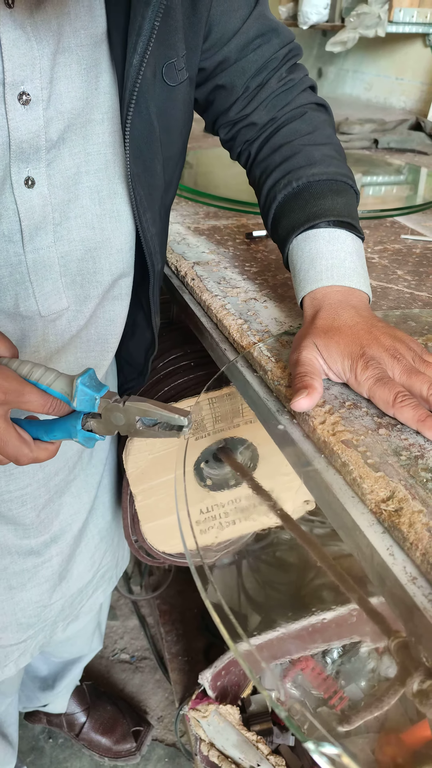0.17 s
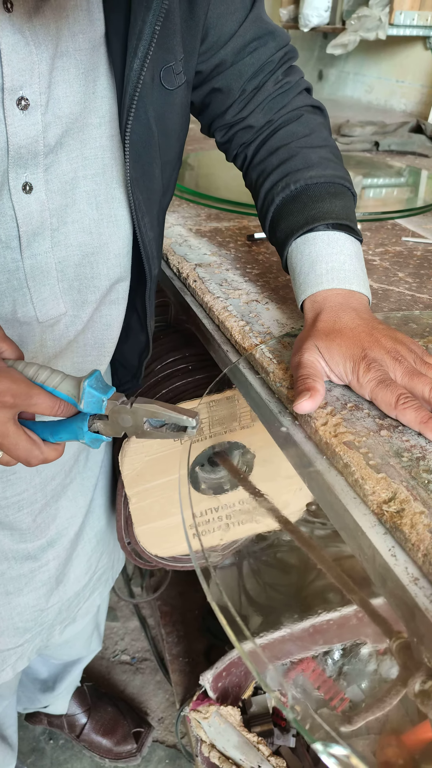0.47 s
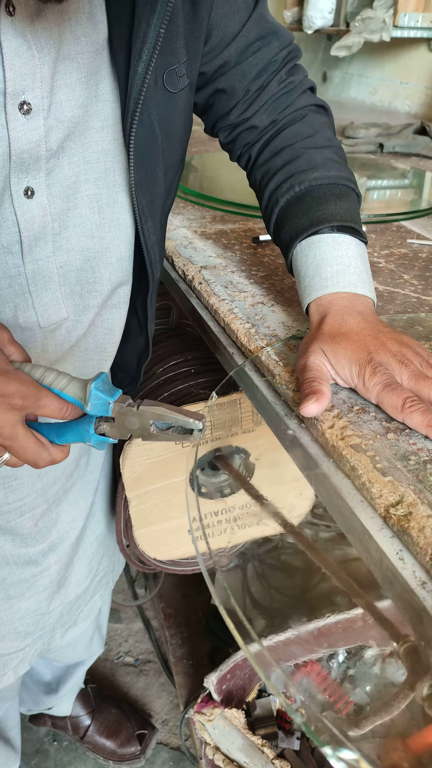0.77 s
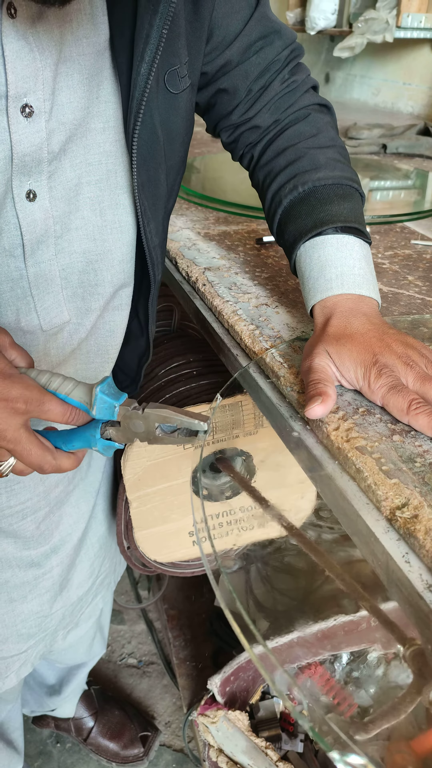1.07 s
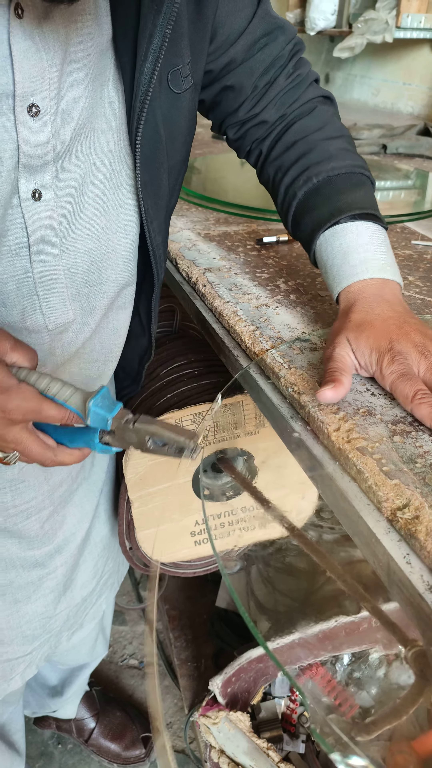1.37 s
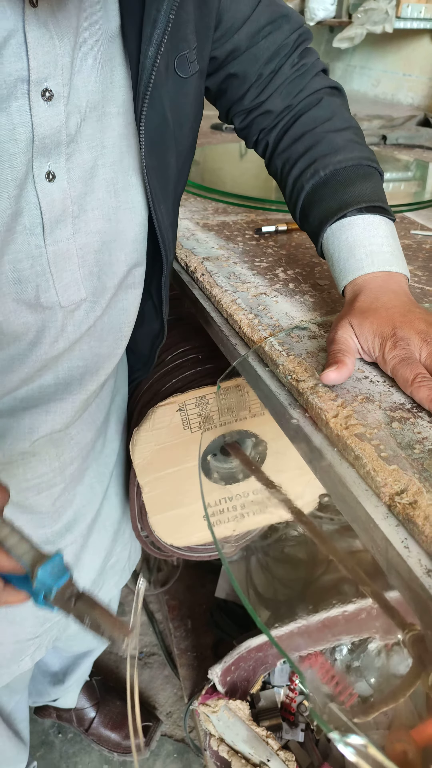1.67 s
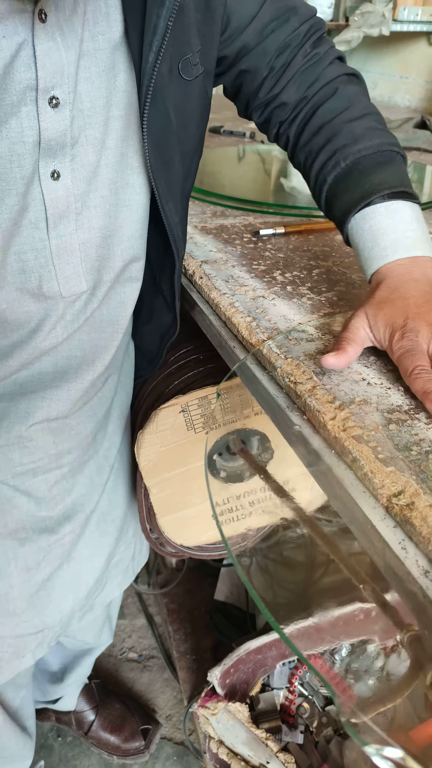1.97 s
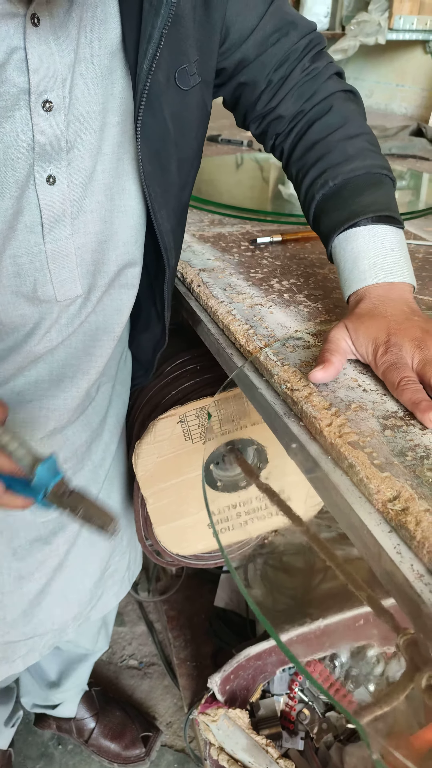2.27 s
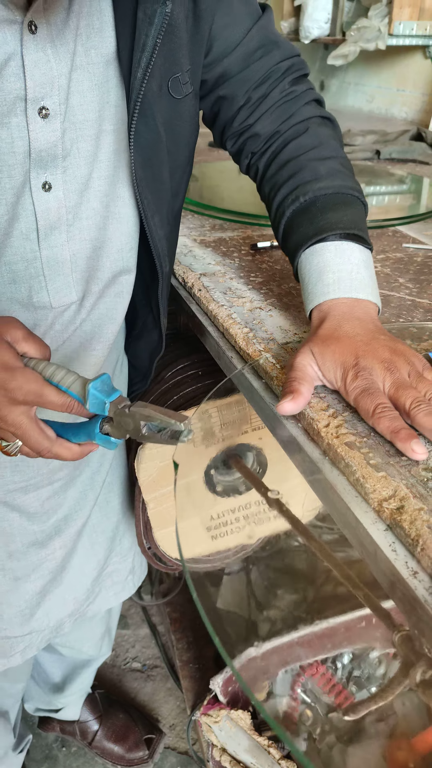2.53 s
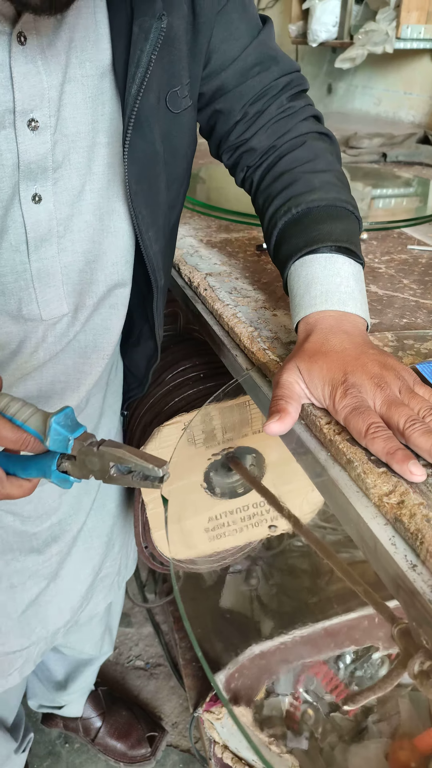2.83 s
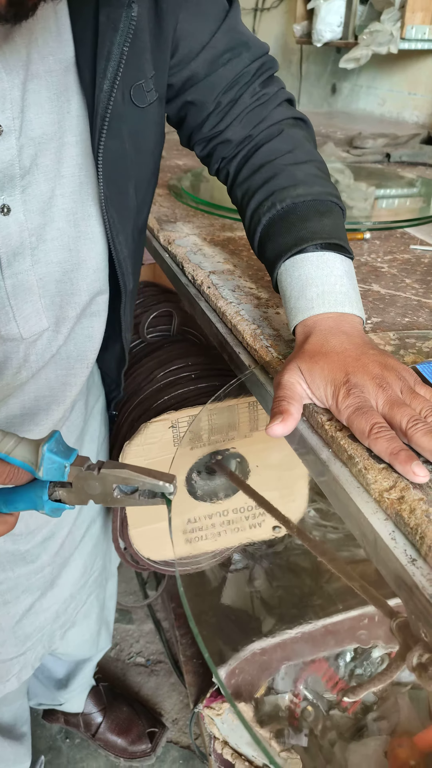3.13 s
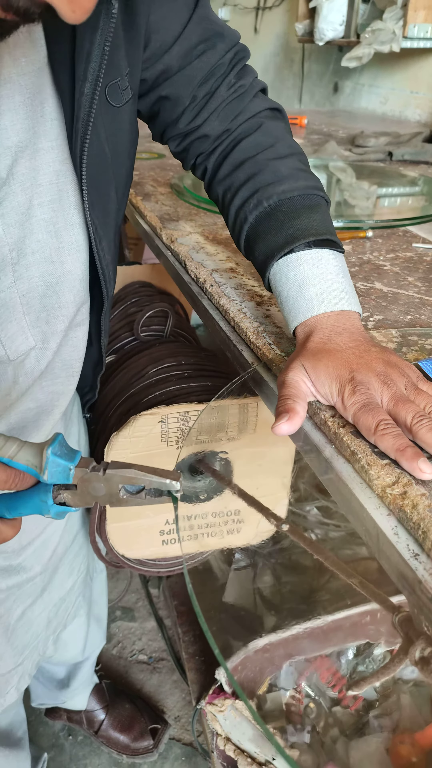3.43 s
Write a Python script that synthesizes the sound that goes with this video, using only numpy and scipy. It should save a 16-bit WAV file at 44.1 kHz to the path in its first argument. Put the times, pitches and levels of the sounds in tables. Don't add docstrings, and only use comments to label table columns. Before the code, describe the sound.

Pliers tick on a glass sheet, then snap off a strip with a loud dry crack. Gritty scrapes follow, the strip lands in ringing clinks, and a softer nip comes after. Close stereo phone in a workshop.

```python
import sys
import numpy as np
from scipy import signal
from scipy.fft import rfft, irfft, next_fast_len
from scipy.io import wavfile
from scipy.ndimage import uniform_filter1d

SR = 44100
rng = np.random.default_rng(int(sys.argv[2]) if len(sys.argv) > 2 else 0)


def boost_factor(decibels):
    exponent = np.asarray(decibels, float) / 20
    return 10 ** exponent


def materialize(psi):
    bounded = np.clip(np.atleast_2d(psi).T, -1, 1)
    quanta = np.round(bounded * 32767).astype(np.int16)
    wavfile.write(sys.argv[1], SR, quanta)


N = 158760


def unit(x):
    return x / np.sqrt(np.mean(x ** 2) + 1e-20)


def along(points, hz):
    f, v = np.transpose(points)
    return np.interp(np.log(hz + 1), np.log(f + 1), v)


def curve(rows):
    return np.interp(np.arange(N) / SR, *np.transpose(rows))


def filtered(x, response):
    m = next_fast_len(x.shape[-1] + 8192)
    spectrum = rfft(x, m) * response(np.fft.rfftfreq(m, 1 / SR))
    return irfft(spectrum, m)[..., :x.shape[-1]]


def resonances(table, f):
    total = 0
    for k, (centre, width, db) in enumerate(table):
        peak = 1j * f * width / (centre * centre - f * f + 1j * f * width)
        total = total + (-1) ** k * boost_factor(db) * peak
    return total


def ports(x, pan_db, lag_s):
    side = np.array([[1], [-1]])
    return filtered(x, lambda f: boost_factor(side * pan_db / 2) * np.exp(-1j * np.pi * f * lag_s * side))


def burst(size, t60, rise_s):
    t = np.arange(size) / SR
    return boost_factor(-60 * t / t60) * (1 - np.exp(-t / rise_s))


def add(track, s, x):
    track[..., round(s * SR):][..., :x.shape[-1]] += x


def spread(noises, turn):
    mid, side = filtered(noises, turn)
    return np.array([mid + side, mid - side])


def glassy(envelope, tilt, own=(), sheet=True):
    # (frequency [Hz], width [Hz], level [dB])
    sheet_modes = [(976, 103, -3.5), (2274, 238, -2.5), (3534, 128.5, -11.5), (4540, 175, 0),
                   (5584, 40, -7.5), (6553, 310, -2.5), (7500, 59, -12.5), (8800, 11, 1.5), (10460, 56, 3),
                   (11440, 30, -1), (12200, 34, -0.5), (13300, 32, -4), (14145, 47, -1.5)]
    # (frequency [Hz], level [dB per Hz])
    edge_colour = [(300, -24), (700, -17), (1650, -14), (2300, 0.5), (4500, -3), (8000, -5.5), (10500, -15),
                   (15000, -13.5)]
    sheet_db, scatter_db, alike = 7.5, 4.5, 0.404
    luck = rng.standard_normal(len(sheet_modes))
    woken = [(c, w, db + sheet_db + scatter_db * g) for (c, w, db), g in zip(sheet_modes, luck)]

    def edge(f):
        return boost_factor(along(edge_colour, f) + tilt * np.log2(f / 4000 + 1e-3))

    def shape(f):
        return edge(f) * (1 + sheet * resonances(woken, f) + resonances(own, f))

    turn = np.arccos(alike) / 2
    sides = [[np.cos(turn)], [np.sin(turn)]]
    noise = envelope * rng.standard_normal((2, len(envelope)))
    stereo = spread(noise, lambda f: shape(f) * sides)
    return stereo / np.sqrt(np.mean(edge(np.arange(SR // 2)) ** 2))


def pliers():
    # (time [s], peak [dB], crack t60 [s], sheet tail [dB], brightness [dB per octave])
    snaps = [
        (0.854, -4, 0.02774, -22.5, 0),
        (2.575, -13, 0.02194, -24, -3.5),
    ]
    # (time [s], peak [dB], ringing [Hz], brightness [dB per octave])
    ticks = [(0.0214, -24.5, 2118, -5), (0.0697, -36.5, 2767, 4.5), (0.09, -32, 2880, 2.5),
             (0.1398, -32, 2287, -2.5), (0.2148, -33.5, 2492, -0.5), (0.5887, -19, 6632, 7),
             (0.6044, -22.5, 6850, 12.5), (0.7992, -28.5, 3214, 6.5), (0.752, -39.5, 8060, 8.5),
             (0.868, -18.5, 3600, 1.5), (0.878, -22, 4690, 2), (0.896, -28.5, 3210, 0),
             (0.915, -34.5, 2500, -1.5), (0.951, -31, 5400, 1), (0.963, -31, 3490, -2.5),
             (1.081, -34.5, 2400, -0.5), (1.098, -33, 2350, 0.5), (1.106, -39.5, 2290, 0),
             (1.165, -27.5, 3810, 2), (1.067, -26.5, 2776, -3), (1.09, -28, 2340, -1),
             (1.1367, -29, 2300, -2), (1.1587, -22.5, 4947, 0), (1.1871, -27.5, 3690, 4),
             (1.247, -32.5, 7230, 10), (1.299, -34.5, 10300, 8.5), (1.327, -37.5, 2400, 7),
             (1.4621, -22, 2240, -0.5), (1.4855, -29, 2260, 2), (1.506, -25, 4540, 3),
             (1.61, -33, 13400, 11.5), (1.642, -33, 12800, 11), (1.676, -40.5, 2170, 3),
             (1.7424, -36, 2860, 7.5), (1.952, -43.5, 6020, 4.5), (1.988, -41, 3000, 0.5),
             (2.587, -29.5, 3240, -2), (2.597, -33, 2300, -1.5), (2.908, -41, 6200, -0.5),
             (2.952, -41, 6200, 2), (3.24, -25, 6470, 4.5), (3.3607, -24.5, 6760, 4)]
    # (time [s], length [s], level [dB], brightness [dB per octave])
    scrapes = [
        (.88, 0.159, -49, -2),
        (1.045, 0.171, -53, -1.5),
        (1.467, 0.0392, -45, 2),
        (2.43, .04, -47, 0),
        (2.057, 0.098, -54, 3),
        (2.82, 0.0292, -52, 4.5),
        (2.995, 0.07, -50, 1),
        (3.244, 0.033, -46.5, 8),
        (3.357, 0.0279, -50, 7),
    ]
    grit_per_s, grit_spread_db, scrape_edge_s = 3000, 3, 0.00596
    out, size = np.zeros((2, N + SR)), SR // 4
    for s, db, t60, tail_db, tilt in snaps:
        crack = glassy(burst(size, t60, 0.001232), tilt, sheet=0.77)
        shiver = boost_factor(tail_db) * glassy(burst(size, 0.105, 0.0033), tilt)
        add(out, s - .001, boost_factor(db) * (crack + shiver))
    for s, db, ring_hz, tilt in ticks:
        ring = [(ring_hz, 168, 10.1)]
        add(out, s - .0005, boost_factor(db - 9.5) * glassy(burst(size // 2, 0.02805, 0.000694), tilt, ring))
    t = np.arange(size) / SR
    for s, length, db, tilt in scrapes:
        grains = rng.random(size) < grit_per_s / SR
        hits = grains * boost_factor(grit_spread_db * np.clip(rng.exponential(1, size), 0, 2))
        grit = unit(signal.lfilter([1], [1, -.97], hits))
        fade_out = np.exp(-np.clip(t - length, 0, 1) / scrape_edge_s)
        stroke = np.clip(t / scrape_edge_s, 0, 1) * fade_out
        add(out, s, boost_factor(db) * glassy(stroke * grit, tilt))
    return ports(out[:, :N], pan_db=-.5, lag_s=-0.0000327)


def strip():
    # (frequency [Hz], level [dB], t60 [s], left minus right [dB])
    strip_modes = [(1431.7, -23, 0.23, -3.5), (2430, -20, .1, -3), (2870, -10.5, 0.413, -0.5),
                   (3700, -8, 0.444, -7), (4694, -6.5, 0.175, -11.5), (5522, -8.5, 0.292, -13),
                   (6420, -6.5, 0.29, -9), (6870, -4, 0.207, -7.5), (7665, -2, 0.154, -12),
                   (9400, 1, 0.168, 4), (10175, -5, 0.0895, -14), (11323, -9, 0.085, -13.5),
                   (12250, -1, 0.141, -6), (13070, -1, 0.1115, -13.5)]
    # (time [s], peak [dB], favoured mode [Hz], share of earlier ringing kept, clack [dB])
    bounces = [(2.1067, -24.5, 4700, 1, -20), (2.140, -39.5, 6870, 0.5, -48.5),
               (2.165, -39.5, 6870, 0.74, -53.5), (2.1773, -23.5, 4700, 0.37, -14),
               (2.1965, -26, 5520, 0.44, -26.5), (2.209, -33.5, 9400, 0.49, -45),
               (2.346, -38.5, 5520, 0.36, -28.5), (2.4135, -28.5, 7660, 0.67, -25),
               (2.431, -30.5, 10180, 0.654, -45), (2.457, -33.5, 6420, 0.67, -50),
               (2.475, -40.5, 6870, 0.654, -55), (2.496, -38, 10180, 0.87, -51.5),
               (2.520, -40.5, 5520, 0.836, -52), (2.577, -55, 5520, 0.42, -55.5),
               (2.6745, -41, 5520, .55, -30), (2.756, -64, 7660, 0.47, -60)]
    # (time [s], mode [Hz], level [dB], t60 [s])
    kicks = [(2.108, 2870, -38, 0.18), (2.111, 12250, -30.5, 0.23), (2.11, 13070, -31, .25),
             (2.123, 7665, -29, .2), (2.108, 4694, -29, .25), (2.145, 4694, -33, 0.21),
             (2.18, 4694, -26, 0.137), (2.195, 7665, -14, 0.058), (2.197, 10175, -34, 0.078),
             (2.208, 9400, -33, .2), (2.216, 6870, -34, .15), (2.232, 7665, -42.5, 0.185),
             (2.197, 5522, -28, 0.131), (2.346, 13070, -39.5, .1), (2.347, 10175, -43.5, .08),
             (2.385, 5522, -47.5, 0.35), (2.42, 5522, -31, 0.187), (2.421, 4694, -37, 0.153),
             (2.428, 9400, -37, .15), (2.432, 3700, -36.5, 0.33), (2.438, 5522, -27.5, 0.277),
             (2.46, 7665, -32.5, 0.16), (2.468, 6870, -31.5, 0.42), (2.484, 3700, -37, 0.37),
             (2.499, 7665, -36, 0.255), (2.503, 13070, -42.5, 0.19), (2.518, 3700, -40.5, .5),
             (2.527, 5522, -42, 0.32), (2.675, 7665, -41, 0.25), (2.705, 7665, -41, 0.298),
             (2.701, 10175, -52.5, 0.35)]
    favour_db, favour_oct, scatter_db = 8, .09, 2.5
    twin_hz, twin_db = 36, -10
    flutter_db, flutter_per_s = 3, 70
    lag_s = .00036
    count = len(strip_modes)
    modes, clack = np.zeros((count, 2, N + SR)), np.zeros((2, N + SR))
    t = np.arange(SR // 3) / SR
    hz, level, t60, pan = np.transpose(strip_modes)[:, :, None]

    def strike(s, pick, db, decay, rise_s, turn, twin):
        kept = np.ones(len(t))
        for later, _, _, share, _ in bounces:
            if later > s:
                kept = kept * np.where(s + t > later, share, 1)
        w = 2 * np.pi * hz[pick] * t
        ring = np.sin(w + 2 * turn)
        ring = ring + boost_factor(twin_db) * np.sin(w + 2 * np.pi * twin_hz * t + 2 * twin)
        ring = ring * kept * (1 - np.exp(-t / rise_s)) * boost_factor(db - 60 * t / decay)
        for k, side in enumerate((1, -1)):
            add(modes[pick, k], s + side * lag_s, ring * boost_factor(side * pan[pick] / 2))

    luck = rng.standard_normal((len(bounces), 3, count, 1))
    for (s, db, favoured, _, clack_db), (size, turn, twin) in zip(bounces, luck):
        near = np.exp(-(np.log2(hz / favoured) / favour_oct) ** 2)
        mode_db = db - 5.5 + level + scatter_db * size + favour_db * near
        strike(s, slice(None), mode_db, t60, 0.00064, turn, twin)
        knock = burst(SR // 8, .009, 0.00034)
        rattle = boost_factor(-15) * burst(SR // 8, 0.132, .002)
        add(clack, s, boost_factor(clack_db) * glassy(knock + rattle, tilt=5, sheet=0))
    for (s, mode_hz, db, decay), (turn, twin) in zip(kicks, rng.standard_normal((len(kicks), 2))):
        k = np.argmin(np.abs(hz - mode_hz))
        strike(s, slice(k, k + 1), db, decay, 0.00192, turn, twin)

    thud_s, thud_db, thud_hz, thud_t60 = 2.5, -32, 519.5, 0.0062
    thud = burst(len(t), thud_t60, 0.00215) * np.sin(2 * np.pi * thud_hz * t)
    add(clack, thud_s, boost_factor(thud_db) * thud)

    knots = rng.standard_normal((count, 600))
    place = np.arange(N) * flutter_per_s / SR
    flutter = np.array([np.interp(place, np.arange(len(v)), v) for v in knots])
    ringing = np.einsum("mcn,mn->cn", modes[..., :N], boost_factor(flutter_db * flutter))
    return ringing + ports(clack[:, :N], -6.5, lag_s)


def room(x):
    # (frequency [Hz], t60 [s])
    wall_t60 = [(500, 0.13), (3000, 0.359), (12000, 0.2094)]
    hz, t, z = signal.stft(rng.standard_normal((2, SR // 2)), SR, nperseg=256)
    fading = boost_factor(-60 * t / along(wall_t60, hz)[:, None])
    tail = signal.istft(z * fading, SR, nperseg=256)[1]
    delayed = np.pad(x, ((0, 0), (200, 0)))
    return signal.fftconvolve(delayed, tail / np.linalg.norm(tail[0]), axes=1)[:, :N]


def pair(alike, response):
    def sides(f):
        turn = np.arccos(np.clip(along(alike, f), -1, 1)) / 2
        return response(f) * [np.cos(turn), np.sin(turn)]

    return unit(spread(rng.standard_normal((2, N)), sides))


def workshop():
    # (frequency [Hz], width [Hz], level [dB])
    drone_tones = [(50.5, 10.45, -4.5), (128.44, 11.79, 2.5), (171.55, 41.8, -9.5), (246.95, 29.85, -13.5),
                   (301.86, 38.95, -11)]
    # (time [s], level [dB])
    drone_swell = [(0, 2), (.55, 1.5), (1.0, -1.5), (1.6, 0.98), (2.1, 1.66), (2.5, -0.66), (2.9, 1.47),
                   (3.6, 2)]
    # (frequency [Hz], level [dB per Hz])
    rumble_colour = [(15, -47), (30, 33), (100, 19), (250, -1), (450, -21.5), (700, -103)]
    # (time [s], level [dB])
    hiss_level = [(0, -55), (.8, -55.5), (1.2, -52.5), (1.6, -53.5), (2.0, -50.5), (2.3, -47.5), (2.9, -48),
                  (3.6, -48.5)]
    # (frequency [Hz], level [dB per Hz])
    hiss_colour = [(250, -53), (400, -2.5), (600, -3), (1700, -9.5), (4000, -19), (6200, -22), (9000, -31),
                   (14000, -39)]
    # (frequency [Hz], left-right likeness)
    hiss_alike = [(350, 1), (700, 0.12), (2000, 0.047), (12000, 0.033)]
    low_alike = [(30, 0.951), (200, 0.9804), (400, 0.747)]  # (frequency [Hz], left-right likeness)
    speedup_s, speedup_takes_s, faster = 2.47, 0.418, 1.0058
    late = np.pi / 2 * curve([(speedup_s, 0), (speedup_s + speedup_takes_s, 1)])
    slow = pair(low_alike, lambda f: resonances(drone_tones, f))
    fast = pair(low_alike, lambda f: resonances(drone_tones, f / faster))
    drone = boost_factor(-41.5 + curve(drone_swell)) * (np.cos(late) * slow + np.sin(late) * fast)
    rumble = boost_factor(-53.5) * pair(low_alike, lambda f: boost_factor(along(rumble_colour, f)))
    hiss = boost_factor(curve(hiss_level) - 3.0) * pair(hiss_alike, lambda f: boost_factor(along(hiss_colour, f)))
    return drone + rumble + hiss


def scene():
    glass = pliers() + strip()
    return glass + boost_factor(-10.5) * room(glass) + workshop()


def top_cut(x):
    return signal.sosfilt(signal.butter(12, 15770, fs=SR, output="sos"), x)


def record(dry):
    # (frequency [Hz], level [dB])
    mic_colour = [(7500, 1), (9800, -5), (12000, 1), (14200, -1), (14600, -16), (15700, -23)]
    duck_above_db, duck_slope, release_s = -19.5, 0.22, 0.084
    x = filtered(dry, lambda f: boost_factor(along(mic_colour, f)))
    power = np.abs(uniform_filter1d(np.mean(x ** 2, 0), size=220))
    over_db = np.clip(10 * np.log10(power + 1e-12) - duck_above_db, 0, None)
    fade = np.arange(N) / SR / release_s
    held_db = np.exp(np.maximum.accumulate(np.log(over_db + 1e-6) + fade) - fade)
    x = x * boost_factor(-duck_slope * uniform_filter1d(held_db, size=260, origin=129))
    return top_cut(x)


dry = scene()
out = record(dry)
materialize(out)
```